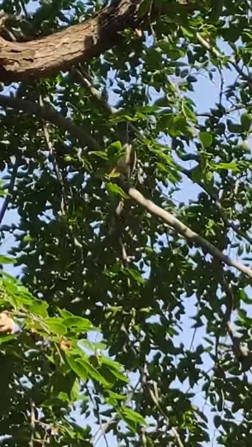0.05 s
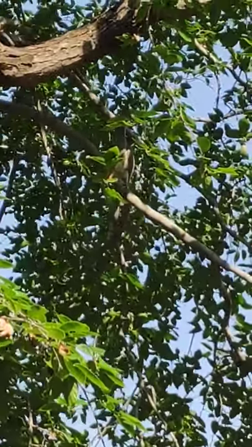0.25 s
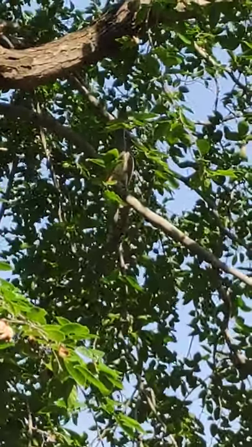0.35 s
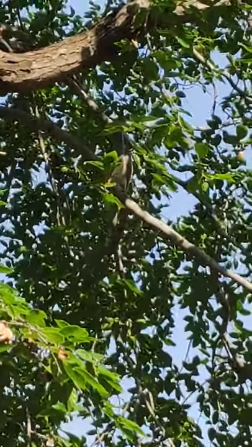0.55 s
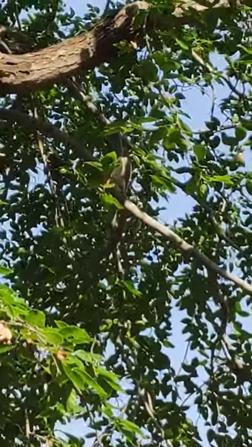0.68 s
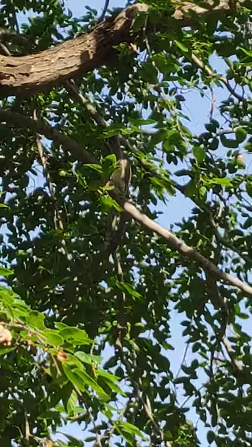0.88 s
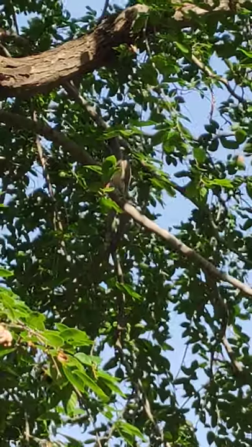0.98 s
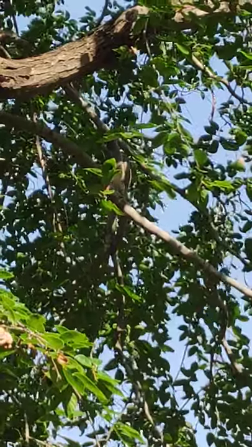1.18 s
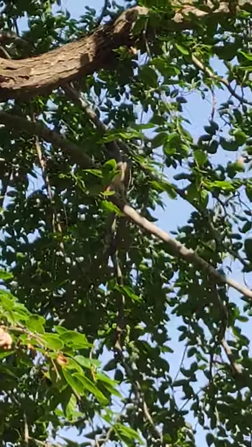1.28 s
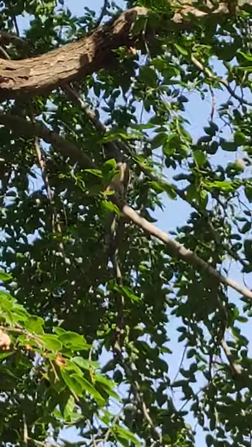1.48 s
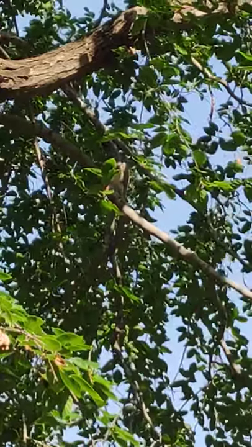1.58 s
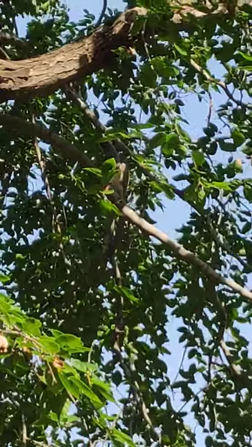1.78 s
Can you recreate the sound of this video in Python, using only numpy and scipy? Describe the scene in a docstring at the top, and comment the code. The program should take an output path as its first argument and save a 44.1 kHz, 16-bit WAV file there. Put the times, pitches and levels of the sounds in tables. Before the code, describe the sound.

A loud, piercing bird chirp rings out once among leaves, over distant twittering and soft air

```python
"""A leafy tree among walls, over a bed of air and far traffic made of flickering noise bands.
A few metres up, one bird calls loudly: a tick of noise, a rough rising stack of harmonics,
a whistle of three partials and a falling, buzzing end.
Farther birds trill, repeat a short song, chirp and whistle, all on gliding sines.
Decaying noise tails stand for the dense echoes off leaves and walls."""
import sys
import numpy as np
from scipy import signal
from scipy.fft import rfft, irfft
from scipy.io import wavfile
from scipy.ndimage import uniform_filter1d

SR = 44100
rng = np.random.default_rng(int(sys.argv[2]) if len(sys.argv) > 2 else 0)


def natural_amplitude(level_db):
    """Convert a level in decibels to a linear amplitude factor, elementwise."""
    exponent = np.asarray(level_db, float) / 20
    return 10 ** exponent


def log_audio(samples):
    """Write samples as a 16-bit WAV file to the path given in sys.argv[1]."""
    # one column per channel
    frames = np.atleast_2d(samples).T
    # limit to full scale, then quantise
    limited = np.clip(frames, -1, 1)
    pcm = np.round(limited * 32767).astype(np.int16)
    wavfile.write(sys.argv[1], SR, pcm)


N = 81585
TIME = np.arange(N) / SR
HZ = np.arange(N // 2 + 1) * SR / N
SIDES = np.array([[.5], [-.5]])  # half of any left-minus-right difference goes to each channel


def track(rows):
    """Columns of a curve as functions of time, and a soft-edged gate that is open while it runs."""
    rows = np.array(rows, float)
    inside = (TIME > rows[0, 0]) & (TIME < rows[-1, 0])
    gate = uniform_filter1d(1. * inside, size=90)
    return [np.interp(TIME, rows[:, 0], column) for column in rows.T[1:]] + [gate]


def on_log(table, hz):
    """Reads a (frequency [Hz], value) table on a log-frequency axis."""
    table = np.array(table, float)
    return np.interp(np.log(np.maximum(hz, 1)), np.log(table[:, 0]), table[:, 1])


def wobble(rate):
    """Smoothed noise of spread 1, averaged twice over 1/rate seconds."""
    k = max(int(SR / rate), 1)
    x = uniform_filter1d(uniform_filter1d(rng.standard_normal(N), k), k)
    return x / x.std()


def sine(hz, db, gate):
    """A pure voice at rms level db while the gate is fully open."""
    return np.sqrt(2) * natural_amplitude(db) * gate * np.sin(2 * np.pi * np.cumsum(hz) / SR)


def notes(rows):
    """Short notes, each a sine gliding evenly in pitch with a soft start and end."""
    out = 0
    for start, length, from_hz, to_hz, db in rows:
        u = np.clip((TIME - start) / length, 0, 1)
        swell = np.sin(np.pi * u ** 1.3) ** .7
        out = out + sine(from_hz + (to_hz - from_hz) * u, db, swell)
    return out


def place(x, pan_db, lag_s):
    """Left and right get one source at different levels and moments."""
    turn = np.exp(-2j * np.pi * HZ * lag_s * SIDES)
    return irfft(rfft(x) * natural_amplitude(pan_db * SIDES) * turn, N)


# colour of air and far traffic: (frequency [Hz], relative density [dB per Hz])
AIR_COLOUR = [(12, -22), (20, 1.5), (49, 0.5), (74, -1.5), (116, -8), (260, -19.5), (334, -19),
              (417, -22.5), (507, -21.5), (838, -21.5), (1460, -30.5), (1680, -34), (1830, -33.5),
              (2220, -36), (2630, -34.5), (5270, -32.5), (7160, -34), (8010, -33.5), (15600, -44.5)]
# likeness of left and right: (frequency [Hz], correlation [-1 to 1])
AIR_ALIKE = [(60, 0.96), (130, 1), (290, 0.88), (640, 0.78), (1410, 0.013), (3100, -0.16), (6820, 0.045),
             (15000, -0.085)]
# left minus right: (frequency [Hz], level difference [dB])
AIR_BALANCE = [(60, -1.0), (110, -1.5), (200, -1.5), (380, -2.0), (700, -2), (1290, 0.5), (2380, 0.0),
               (4400, 3.0), (8120, 1), (15000, 8.5)]
AIR_DB, FLICKER_DB = -56, 1.4  # rms of the mean of both channels; spread of each band's level


def air():
    """Third-octave-spaced bands of noise that flicker a little; the bass is alike left and right."""
    alike = np.clip(on_log(AIR_ALIKE, HZ), -.9, .99)
    mid, side = rfft(rng.standard_normal((2, N))) * natural_amplitude(on_log(AIR_COLOUR, HZ))
    side = side * np.sqrt((1 - alike) / (1 + alike))
    both = np.array([mid + side, mid - side])
    both = both * natural_amplitude(on_log(AIR_BALANCE, HZ) * SIDES)
    out = 0
    for octave in np.arange(4, 14.4, 1 / 3):  # band centre, log2 of Hz
        distance = np.abs(np.log2(np.maximum(HZ, 1)) - octave)
        share = np.clip(1 - 3 * distance, 0, 1)
        out = out + natural_amplitude(FLICKER_DB * wobble(19)) * irfft(both * share, N)
    return out * natural_amplitude(AIR_DB) / out.mean(axis=0).std()


# trills: (start [s], sweeps [count], period [s], first level [dB], last level [dB])
TRILL_RUNS = [(-.02, 7, 0.028, -60.5, -65.5), (1.625, 6, 0.027, -67.5, -66.5)]
# parts of a sweep: (time after its start [s], length [s], from [Hz], to [Hz], level offset [dB])
SWEEP_PARTS = [(0, 0.01, 8440, 6590, 0.5), (.007, 0.0074, 6400, 5420, -0.5)]
# random spread of each part: moment [s], level [dB], pitch [share]
TRILL_UNEVEN = .0015, 2, .015


def trills():
    """Two runs of quick down-sweeps, slightly uneven; the second lacks the low part of the sweep."""
    sweeps = []
    for run, parts in zip(TRILL_RUNS, (SWEEP_PARTS, SWEEP_PARTS[:1])):
        start, count, period, first_db, last_db = run
        for k, db in enumerate(np.linspace(first_db, last_db, int(round(count)))):
            for after, length, from_hz, to_hz, part_db in parts:
                late, loud, high = rng.standard_normal(3) * TRILL_UNEVEN
                begin = start + k * period + after + late
                sweeps.append((begin, length, from_hz * (1 + high), to_hz * (1 + high),
                               db + part_db + loud))
    return notes(sweeps)


# notes of one phrase: (time after its start [s], length [s], from [Hz], to [Hz], level [dB])
PHRASE_NOTES = [(0, .03, 3980, 3430, -70.5), (0.025, 0.015, 3500, 3500, -66), (0.062, .01, 3730, 3350, -70),
                (0.202, 0.0316, 2057, 2300, -76), (0.24, 0.016, 2688, 3150, -75.5)]
# phrase starts: (time [s])
PHRASE_STARTS = [-.155, .247, .648, 1.05, 1.448]


def song():
    """One short phrase of gliding sines, repeated unchanged."""
    return notes([(start + row[0], *row[1:]) for start in PHRASE_STARTS for row in PHRASE_NOTES])


TICK_S, TICK_RISE_S, TICK_LEN_S = .176, .0014, .004  # start, linear rise, decay time constant
TICK_HZ, TICK_WIDE_HZ, TICK_GAIN_DB = 3500, 3070, -36.5


def tick():
    """A burst of noise that rises fast, dies exponentially and passes one broad band."""
    edges = [TICK_HZ - TICK_WIDE_HZ / 2, TICK_HZ + TICK_WIDE_HZ / 2]
    band = signal.butter(2, edges, "band", fs=SR, output="sos")
    rise = np.clip((TIME - TICK_S) / TICK_RISE_S, 0, 1)
    decay = np.exp(-np.maximum(TIME - TICK_S, 0) / TICK_LEN_S)
    return natural_amplitude(TICK_GAIN_DB) * signal.sosfilt(band, rng.standard_normal(N) * rise * decay)


# softer singing is duller: dB lost per kHz for each dB under full effort
DULL_PER_KHZ, FULL_DB = .053, -40


def slide(rows, throat):
    """A buzzy voice: harmonics through the throat, each smeared by unsteady vibration."""
    hz, db, rough, gate = track(rows)
    phase, rough = 2 * np.pi * np.cumsum(hz) / SR, np.clip(rough, 0, 2)
    softness_db = np.minimum(db - FULL_DB, 0)
    out = 0
    for k in range(1, 15):
        noise = wobble(1500) + 1j * wobble(1500)
        unsteady = np.exp(1j * np.pi * k * k / 7) + rough * .35 * k ** 1.5 * noise
        # roughness smears a harmonic while its power stays about even
        unsteady = unsteady / np.sqrt(1 + rough ** 2 * k ** 3 / 4)
        colour_db = on_log(throat, k * hz) + DULL_PER_KHZ * k * hz / 1000 * softness_db
        harmonic = np.imag(unsteady * np.exp(1j * k * phase))
        out = out + (k * hz < 16000) * natural_amplitude(colour_db) * harmonic
    return natural_amplitude(db) * gate * out


# opening slide: (time [s], pitch [Hz], level before throat colour [dB], roughness [0-1])
RISE_CURVE = [(.1945, 1030, -66, 0.1), (.1965, 1012, -45.5, .03), (.204, 967, -46.5, 0.1),
              (.213, 1137, -44, 0), (.222, 1246, -41, 0.15), (.232, 1368, -40, 0.17),
              (.237, 1927, -41, 0.2), (.243, 2475, -36.5, 0.3), (.25, 2857, -41, 0.5),
              (.257, 2977, -43, 0.1), (.261, 3150, -74, 0.3)]
# throat colour of the opening slide: (frequency [Hz], gain [dB])
RISE_THROAT = [(900, -18.5), (1400, -18.5), (2000, -11), (2700, -4.5), (3500, 5.5), (4300, -3),
               (5000, -2.5), (6500, -3), (8000, -11.5), (11000, -17), (15000, -25.5)]


def rising_slide():
    """A rough stack of harmonics climbing in pitch through the throat's resonance."""
    return slide(RISE_CURVE, RISE_THROAT)


# whistle: (time [s], pitch [Hz], fundamental [dB], overtones [dB]), before the partial gains
WHISTLE_CURVE = [(.254, 3976, -48, -84), (.261, 4095, -49, -46), (.267, 4130, -44, -51.5),
                 (.276, 4293, -43, -48), (.283, 4315, -32.5, -56), (.29, 4292, -29.5, -56.5),
                 (.296, 4314, -37.5, -48), (.302, 4357, -50, -50.5), (.308, 4339, -35.5, -54),
                 (.314, 4247, -60, -62), (.325, 4325, -43, -77), (.337, 4320, -56, -49),
                 (.346, 4230, -39.5, -66), (.356, 4600, -77, -76)]
# partials: (multiple of pitch, gain [dB], left minus right [dB], left's phase lead [rad])
WHISTLE_PARTIALS = [(1, 3.5, 5, -2), (2, 5, 8.5, 4.13), (3, -13.5, 21, -3)]
FLUTTER_DB, FLUTTER_PITCH = .7, .0015  # spread of level; spread of pitch as a share


def whistle():
    """A fluttering tone and two overtones, each with its own balance and phase left and right."""
    hz, db, over_db, gate = track(WHISTLE_CURVE)
    phase = 2 * np.pi * np.cumsum(hz * (1 + FLUTTER_PITCH * wobble(110))) / SR
    tone = 0
    for k, gain_db, pan_db, lead in WHISTLE_PARTIALS:
        level_db = gain_db + (db if k == 1 else over_db) + FLUTTER_DB * wobble(150)
        wave = np.sin(k * phase + lead * SIDES)
        tone = tone + np.sqrt(2) * gate * natural_amplitude(level_db + pan_db * SIDES) * wave
    return tone


# falling end: (time [s], pitch [Hz], level before throat colour [dB], roughness [0-1])
FALL_CURVE = [(.355, 2561, -64, 0), (.3575, 2538, -42.5, 0), (.362, 2490, -41.5, 0.1),
              (.365, 2330, -37.5, .2), (.369, 2000, -47, 0.25), (.374, 1530, -43.5, .25),
              (.377, 1306, -62, .3)]
# throat colour as the beak closes: (frequency [Hz], gain [dB])
FALL_THROAT = [(1500, -21), (2400, -12.5), (3500, 2.5), (5000, 2), (7000, -8), (9000, -14), (12000, -31)]


def falling_end():
    """Harmonics dropping in pitch, coloured by the throat with the beak closing."""
    return slide(FALL_CURVE, FALL_THROAT)


# near bird's buzz, left minus right: (frequency [Hz], level difference [dB])
BUZZ_PAN = [(1000, 1), (2500, 4), (5000, 6.5), (8000, 2), (12000, 18)]
BUZZ_LAG_S = .00006
# a thick branch returns the buzz; pan is left minus right
BRANCH_S, BRANCH_DB, BRANCH_PAN_DB = .0075, -12, -1
WHISTLE_WET_DB = -13  # the whistle's share in the echoes


def near_bird():
    """The whole call with its branch echo; returns the stereo sound and the voice that feeds the tree."""
    buzz = tick() + rising_slide() + falling_end()
    tone = whistle()
    echo = natural_amplitude(BRANCH_DB) * np.roll(buzz, int(BRANCH_S * SR))
    branch = place(echo, BRANCH_PAN_DB, 0)
    direct = place(buzz, on_log(BUZZ_PAN, HZ), BUZZ_LAG_S)
    return direct + branch + tone, buzz + natural_amplitude(WHISTLE_WET_DB) * tone[0]


# rising far whistle: (time [s], pitch [Hz], level [dB])
UP_CURVE = [(.772, 5340, -80), (.79, 5310, -77), (.81, 5530, -63), (.835, 5660, -70), (.855, 5750, -65),
            (.864, 5980, -63), (.869, 6000, -77)]


def up_whistle():
    """A far pure tone that climbs overall."""
    return sine(*track(UP_CURVE))


# falling far whistle: (time [s], pitch [Hz], level before flutter [dB])
DOWN_CURVE = [(1.055, 6070, -72), (1.075, 6260, -69.5), (1.13, 6156, -63), (1.21, 5950, -62.5),
              (1.25, 5846, -73), (1.32, 5680, -75), (1.35, 5510, -63.5), (1.38, 5330, -67.5),
              (1.405, 4980, -60), (1.43, 4840, -66.5), (1.455, 4790, -64), (1.465, 4870, -74)]
# a second whistler sings the phrase a little later, at an even level before flutter
ANSWER_S, ANSWER_DB = .24, -73
FAR_FLUTTER_DB = 2.5  # spread of level


def down_whistles():
    """Two far pure tones follow one mostly falling phrase, each fluttering on its own."""
    hz, db, gate = track(DOWN_CURVE)
    first = sine(hz, db + FAR_FLUTTER_DB * wobble(40), gate)
    answer = sine(hz, ANSWER_DB + FAR_FLUTTER_DB * wobble(40), gate)
    return first + np.roll(answer, int(ANSWER_S * SR))


# single chirps: (time [s], length [s], from [Hz], to [Hz], level [dB])
CHIRP_NOTES = [(1.17, 0.026, 2700, 2580, -76), (1.182, 0.016, 2500, 3220, -69),
               (1.195, 0.035, 2950, 3160, -81), (1.2, .03, 3500, 3430, -77),
               (1.215, 0.063, 4350, 5000, -74.5), (1.51, 0.0502, 3665, 3796, -77.5),
               (1.59, 0.034, 7920, 7830, -69)]


def chirps():
    """Faint single notes on short gliding sines."""
    return notes(CHIRP_NOTES)


FAR_LAG_S = .00003
TRILL_WET_DB, SONG_WET_DB, WHISTLERS_WET_DB = 7, 2, -4  # shares in the echoes


def far_birds():
    """Trills lean left, the others a little right; returns the stereo sound and the echoes' feed."""
    # (voice, left minus right [dB], share in the echoes [dB])
    voices = [(trills(), 3, TRILL_WET_DB), (song() + chirps(), -1.5, SONG_WET_DB),
              (up_whistle() + down_whistles(), -1.5, WHISTLERS_WET_DB)]
    direct = sum(place(voice, pan_db, FAR_LAG_S) for voice, pan_db, _ in voices)
    return direct, sum(voice * natural_amplitude(wet_db) for voice, _, wet_db in voices)


TREBLE_HZ, TREBLE_T60_SHARE = 6800, .75  # treble above this decays in this share of the T60


def scatter(x, t60, db):
    """Dense echoes, unrelated left and right; the treble dies first."""
    t = np.arange(SR) / SR
    noise = rng.standard_normal((2, len(t)))
    low = signal.sosfilt(signal.butter(2, TREBLE_HZ, fs=SR, output="sos"), noise)
    low_tail = low * natural_amplitude(-60 * t / t60)
    high_tail = (noise - low) * natural_amplitude(-60 * t / (t60 * TREBLE_T60_SHARE))
    tail = (low_tail + high_tail) * np.minimum(t / .0013, 1)
    tail = tail / np.sqrt(np.sum(tail ** 2, axis=1, keepdims=True))
    return natural_amplitude(db) * signal.fftconvolve(x[None], tail, axes=1)[:, :N]


# colour of the near call's scattered sound: (frequency [Hz], gain [dB])
SCATTER_COLOUR = [(1000, -3), (2500, -10.5), (4000, 0.5), (6500, 5.5), (9000, 12.5), (13000, 3.5)]
LEAF_T60_S, LEAF_DB = .15, -4  # short echoes of all birds
TREE_T60_S, TREE_DB = .83, -6  # long echoes of the near bird
YARD_T60_S, YARD_DB = .52, -5.5  # long echoes of the far birds


def scene():
    """Birds direct, through the leaves and through the wider surroundings, over the air."""
    bed = air()
    far, far_voice = far_birds()
    near, near_voice = near_bird()
    near_voice = irfft(rfft(near_voice) * natural_amplitude(on_log(SCATTER_COLOUR, HZ)), N)
    leaves = scatter(near_voice + far_voice, LEAF_T60_S, LEAF_DB)
    tree = scatter(near_voice, TREE_T60_S, TREE_DB)
    yard = scatter(far_voice, YARD_T60_S, YARD_DB)
    return near + far + leaves + tree + yard + bed


def top_cut(x):
    """Nothing passes above the cut-off."""
    return signal.sosfilt(signal.butter(12, 15780, fs=SR, output="sos"), x)


def record(dry):
    """Hands on the finished mix."""
    return top_cut(dry)


dry = scene()
out = record(dry)
log_audio(out)
```